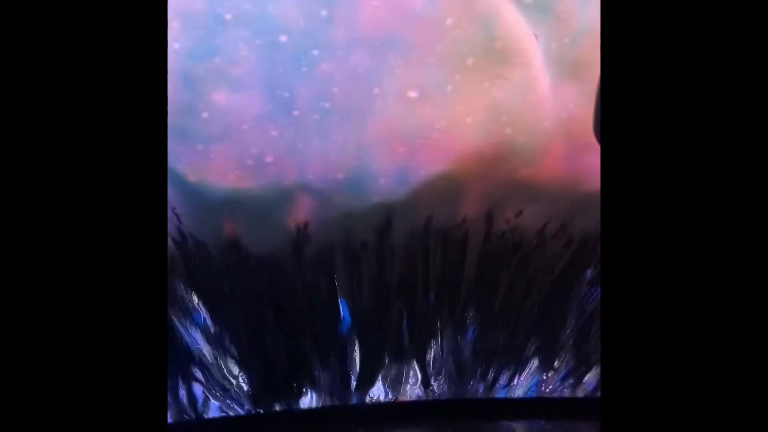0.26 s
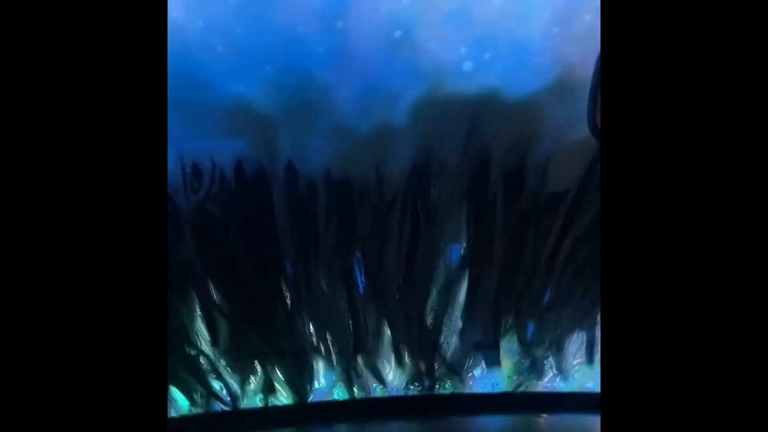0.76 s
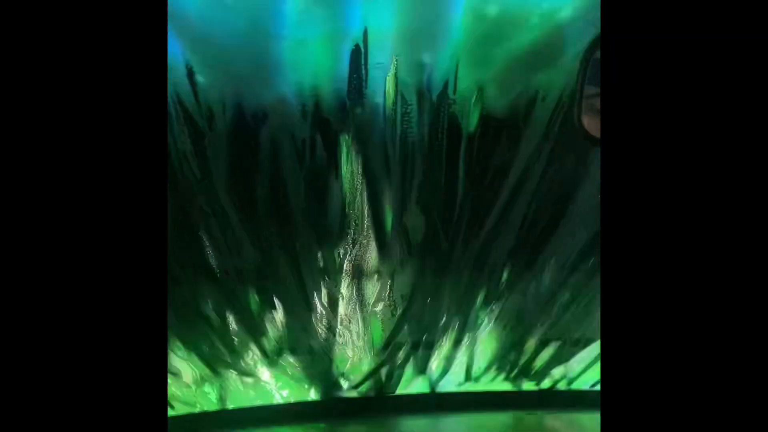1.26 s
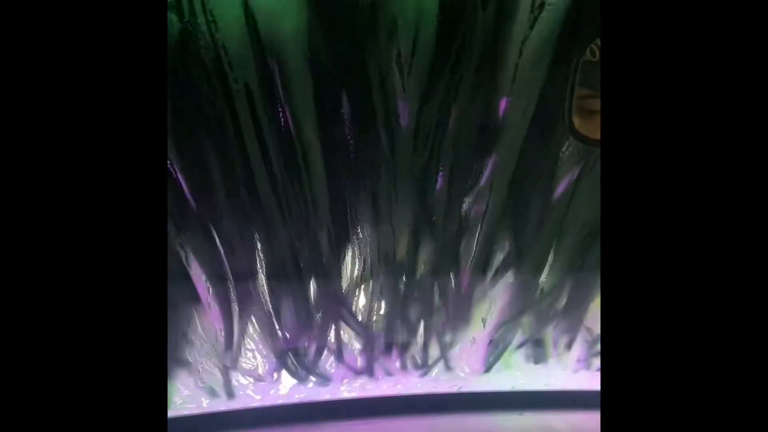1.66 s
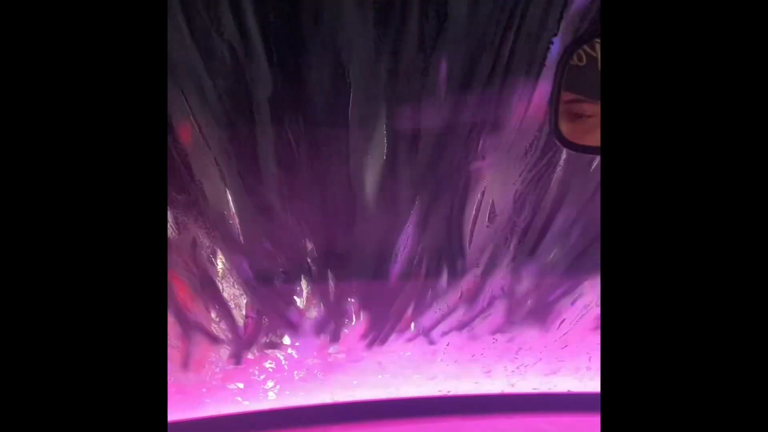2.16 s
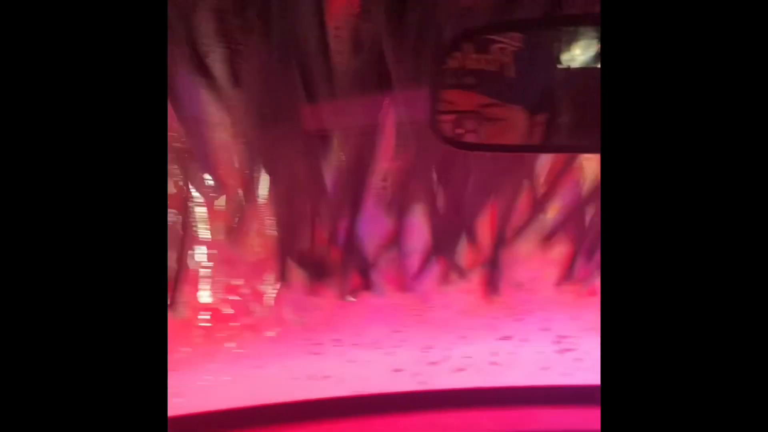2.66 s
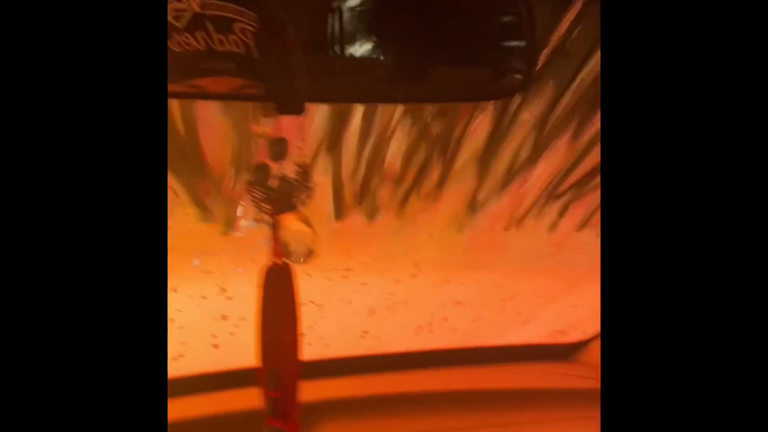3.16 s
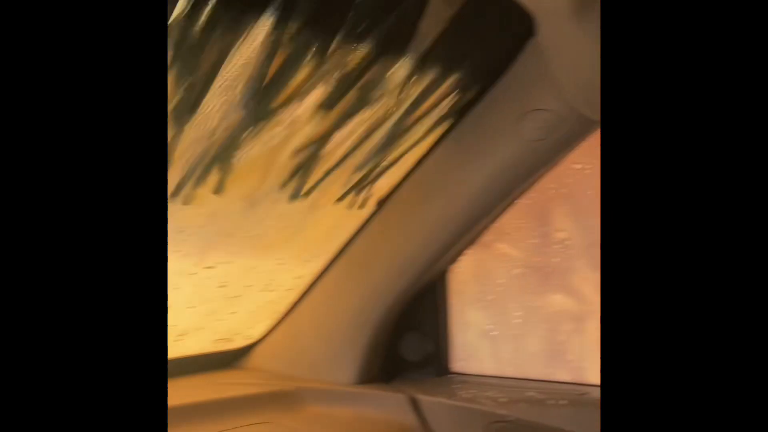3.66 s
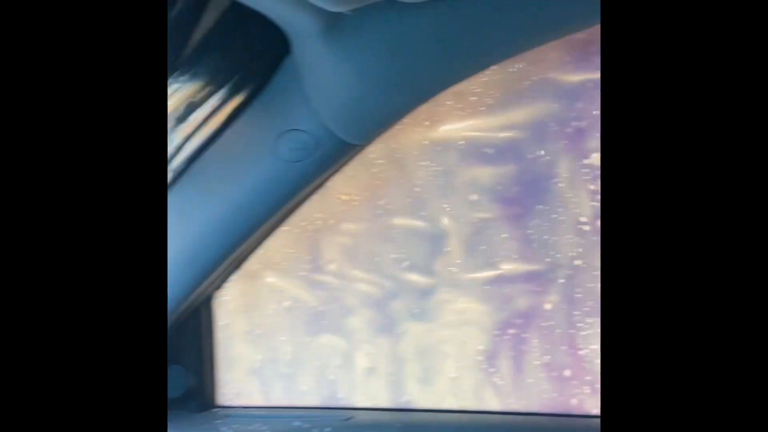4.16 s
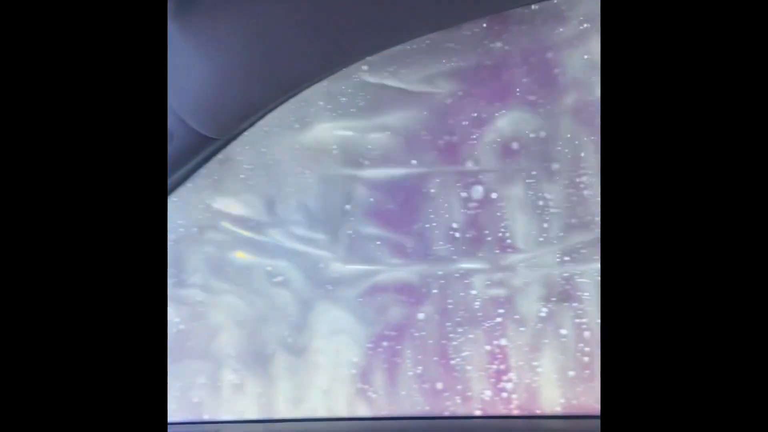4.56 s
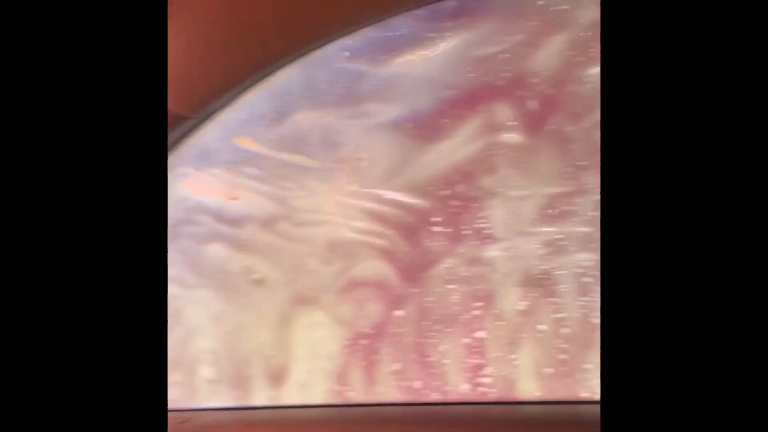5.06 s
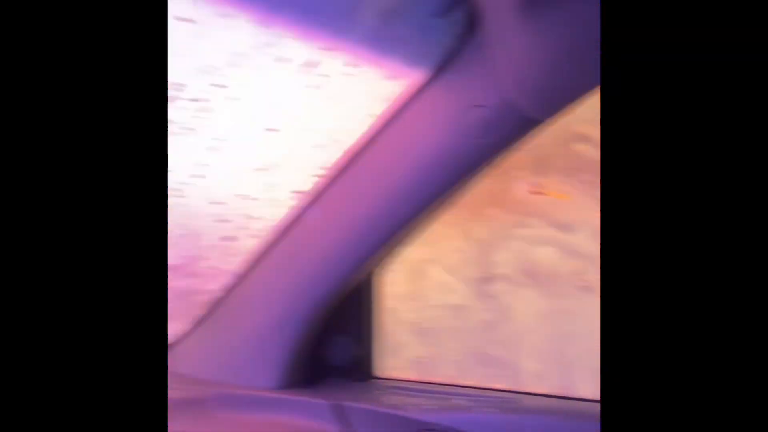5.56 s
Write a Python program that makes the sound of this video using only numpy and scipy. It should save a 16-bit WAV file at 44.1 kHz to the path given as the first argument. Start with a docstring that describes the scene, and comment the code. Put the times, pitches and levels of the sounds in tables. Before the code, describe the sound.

Inside a closed car in an automatic wash, wet strips slap and crackle on the windscreen over deep rumble, then thin to duller thuds and pattering spray.

```python
"""An automatic car wash heard from inside the closed car.
First a roller's wet strips smack and scrub the windscreen, some twenty bundles in the first second: crackling
bursts of tiny blows ring in the glass, heavy bumps in panels and cabin air, under water hiss.
From about 2 s the blows grow sparser and duller as the strips climb to the roof; brief stick-slip squeaks begin.
By 4 s the listener faces the side window, where spray and gobs patter; at the end the pouring on the roof swells."""
import sys
import numpy as np
from scipy import signal
from scipy.fft import rfft, irfft, next_fast_len
from scipy.io import wavfile
from scipy.ndimage import uniform_filter1d

SR = 44100
rng = np.random.default_rng(int(sys.argv[2]) if len(sys.argv) > 2 else 0)


def waveform_to_disk(signal):
    """Save audio, clipped to [-1, 1], as 16-bit WAV at the path in sys.argv[1]."""
    frames = np.transpose(np.atleast_2d(signal))
    scaled = np.clip(frames, -1, 1) * 32767
    samples = np.round(scaled).astype(np.int16)
    wavfile.write(sys.argv[1], SR, samples)


N = 256220
TIME = np.arange(N) / SR
SIZE = next_fast_len(N + SR // 2)
HZ = np.maximum(np.arange(SIZE // 2 + 1) * SR / SIZE, 1)
SIDES = np.array([[1], [-1]])  # left, right


# bundles of wet strips landing, relative levels:
# (time [s], contact [s], thud level [dB], smack level [dB], splash level [dB])
BUNDLE_LANDINGS = [(0.014, 0.043, -33, -30, -38), (.098, 0.017, -40, -30, -41),
                   (0.132, 0.02, -26, -25, -34.5), (.186, 0.0059, -42, -29, -47),
                   (0.22, 0.035, -27, -29, -40), (0.264, 0.024, -34, -25, -36.5),
                   (.303, 0.025, -38, -28, -37.5), (0.338, 0.048, -31, -34, -45),
                   (0.413, .026, -39, -23, -36.5), (0.436, 0.015, -30, -20, -33.5),
                   (0.53, 0.046, -26.5, -24.5, -34), (0.617, 0.028, -39, -29, -36),
                   (0.648, 0.033, -23.5, -25.5, -35.5), (0.742, 0.015, -42, -23.5, -38),
                   (.763, 0.02, -40, -23, -34), (0.832, .016, -41, -28, -35),
                   (.853, .02, -23.5, -25.5, -35), (.885, 0.018, -38, -29.5, -40),
                   (.948, 0.015, -27, -29.5, -37), (0.972, 0.0077, -23.5, -19, -27),
                   (.998, 0.026, -40, -30, -38), (1.055, 0.038, -44, -31, -37.5),
                   (1.103, 0.017, -21.5, -27, -31), (1.155, 0.015, -40, -28, -39),
                   (1.188, 0.0085, -38, -26, -29), (1.233, .016, -21, -40, -51),
                   (1.256, 0.014, -26, -25.5, -39), (1.296, 0.0098, -40, -27, -35),
                   (1.314, 0.023, -38, -26.5, -32), (1.353, 0.019, -25, -31.5, -38.5),
                   (1.385, .016, -27, -46, -55), (1.432, .028, -50, -32, -39.5),
                   (1.512, 0.023, -23.5, -34.5, -48), (1.58, 0.013, -30, -25, -38),
                   (1.613, 0.02, -22.5, -31, -37.5), (1.69, .006, -28, -33.5, -45),
                   (1.72, 0.021, -33, -34.5, -43.5), (1.755, 0.014, -21, -38, -45),
                   (1.82, 0.0061, -44, -37, -36), (1.852, 0.05, -30, -37, -44),
                   (2.07, 0.024, -23, -36, -46), (2.113, 0.014, -24, -33, -40),
                   (2.149, 0.014, -30, -42, -40), (2.24, 0.026, -36, -37, -44.5),
                   (2.302, 0.041, -29.5, -35, -42.5), (2.354, 0.016, -26, -38, -43),
                   (2.448, 0.023, -24, -32.5, -41), (2.556, 0.017, -36, -37, -39),
                   (2.618, .004, -42, -39, -39), (2.648, 0.018, -27, -44, -48),
                   (2.687, 0.021, -28.5, -36, -39), (2.838, 0.013, -40, -39, -38.5),
                   (2.868, 0.027, -32, -45, -42), (3.0, 0.05, -34, -43, -45),
                   (3.125, 0.044, -31.5, -39, -47), (3.192, .016, -40, -38, -42.5),
                   (3.251, 0.031, -46, -35, -40), (3.36, 0.063, -46, -44, -44),
                   (3.451, 0.015, -34, -32.5, -34.5), (3.553, 0.013, -35, -31.5, -39),
                   (3.715, .02, -40, -55, -60), (3.815, 0.047, -30.5, -46, -47.5),
                   (3.95, 0.037, -38, -47, -48), (4.055, .025, -32, -44, -49),
                   (4.14, .025, -42, -36.5, -50), (4.215, .018, -40, -39, -46),
                   (4.27, 0.041, -30.5, -43, -52), (4.352, 0.014, -34, -41, -51),
                   (4.5, 0.016, -29, -44, -58), (4.522, .014, -40, -37.5, -50),
                   (4.57, 0.014, -38, -38, -54), (4.735, 0.027, -30, -46, -54),
                   (4.86, 0.015, -36, -48, -52), (4.92, .004, -47, -45, -43), (5.145, 0.048, -33, -51, -58),
                   (5.32, .02, -32, -45, -56), (5.44, 0.022, -31, -40, -53), (5.66, 0.018, -26.5, -48, -54),
                   (5.71, 0.022, -30, -46, -58)]
# relative spectral density of the smack: (frequency [Hz], level [dB])
SMACK_COLOUR = [(900, -4), (1500, -2), (2000, 0.5), (3200, -2), (3900, -4.5), (5000, -27.5)]
# relative spectral density of the splash: (frequency [Hz], level [dB])
SPLASH_COLOUR = [(2800, -20.5), (4100, 0.5), (5400, 2), (6300, -1), (7500, -5), (9800, -14.5), (11500, -20),
                 (12500, -39)]


def slaps():
    """On the glass each bundle lands as a crackling smack of single strips and a splash of thrown water."""
    smack_rows = [(s, contact_s, db) for s, contact_s, _, db, _ in BUNDLE_LANDINGS]
    splash_rows = [(s, contact_s, db) for s, contact_s, _, _, db in BUNDLE_LANDINGS]
    smack_force = strokes(smack_rows, rise_s=0.004, fall_s=0.012)
    splash_force = strokes(splash_rows, rise_s=0.003, fall_s=0.0084)
    clumps = from_db(0.92 * drift(160))  # clumped strips share the force
    smack_blows = steady(clumps * impacts(3200, 0.55), seconds=0.011)
    splash_blows = steady(clumps * impacts(4200, 0.5), seconds=0.014)
    smack = scatter(smack_force * smack_blows, span_s=0.045, ring_s=0.0053, ring_db=-3.5)
    splash = scatter(splash_force * splash_blows, span_s=0.045, ring_s=0.0078, ring_db=-3.0)
    smack = from_db(0.5) * radiate(smack, glass(SMACK_COLOUR))
    splash = from_db(4.0) * radiate(splash, glass(SPLASH_COLOUR))
    return smack + splash


# relative spectral density of the thud: (frequency [Hz], level [dB])
THUD_COLOUR = [(330, -24.5), (470, 8), (600, -7.5), (720, 0), (850, 0.5), (950, -13), (1300, -11.5),
               (1600, -14.5), (2400, -42.5)]


def thuds():
    """On sheet metal a bundle lands as a dull, hollow thud."""
    blows = scatter(impacts(4000, 0.52), span_s=0.05, ring_s=0.01, ring_db=2.0)
    metal = steady(radiate(blows, glass(THUD_COLOUR)), seconds=0.01)
    landings = [(s, contact_s, db) for s, contact_s, db, _, _ in BUNDLE_LANDINGS]
    return from_db(-0.15) * strokes(landings, rise_s=0.024, fall_s=0.0084) * metal


# hard tips of single strips whipping the glass: (time [s], relative level [dB])
TIP_CRACKS = [(0.136, -24), (0.151, -23), (0.2706, -23), (0.422, -24), (0.4362, -20), (.441, -14),
              (.448, -33), (.5335, -21), (.546, -22), (.563, -23), (.661, -24), (.677, -23), (.748, -19),
              (0.765, -25), (.777, -14), (.835, -25), (.864, -24), (0.975, -19), (.979, -17), (1.111, -25),
              (1.161, -23), (1.195, -21), (1.265, -21), (1.321, -16), (1.335, -23), (1.436, -24),
              (1.457, -23), (1.587, -23), (1.693, -26), (2.118, -26), (2.155, -25), (2.241, -29),
              (2.303, -23), (2.327, -25), (2.366, -29), (2.462, -36), (2.62, -23), (2.697, -23),
              (2.846, -24), (3.205, -29), (3.258, -25), (3.456, -23.5), (3.559, -22), (3.991, -31),
              (4.316, -31), (4.442, -31), (4.921, -30), (5.148, -30), (5.307, -30), (5.368, -30),
              (5.603, -30)]
# relative spectral density of a crack: (frequency [Hz], level [dB])
TIP_COLOUR = [(700, -5), (1500, -2), (2200, -1.5), (3500, 3), (5400, -1), (6400, -9), (7500, -12),
              (9800, -36), (12300, -44)]


def tips():
    """A strip's tip cracks on the windscreen like a tiny whip: a noise burst of about a millisecond."""
    force, fall_s = np.zeros((2, N)), 0.0013
    age = TIME[:SR // 100]
    for s, db in TIP_CRACKS:
        start = int(s * SR)
        crack = rms_one(np.exp(-age / fall_s) * rng.standard_normal((2, len(age))))
        force[:, start:start + len(age)] += from_db(db) * crack
    return from_db(-13.0) * radiate(force, glass(TIP_COLOUR, ringing=0.83))


# roller pressure, as relative rumble level: (time [s], cabin boom level [dB], panel drumming level [dB])
ROLLER_PRESSURE = [(0, -22, -24), (0.3, -27, -19.5), (0.8, -26, -21.5), (1.4, -23.5, -22),
                   (2.0, -26.5, -19.5), (2.55, -21, -21), (3.1, -25.5, -21.5), (3.8, -27, -24),
                   (4.4, -31, -25), (5.2, -28.5, -24), (5.81, -27, -26)]
# heavy bumps of the roller on the body, relative levels:
# (time [s], contact [s], cabin boom level [dB], panel drumming level [dB])
ROLLER_BUMPS = [(0.05, .025, -29, -15.5), (0.14, 0.068, -17, -20), (0.228, 0.042, -14.5, -28),
                (0.372, 0.022, -25, -16.5), (0.437, 0.038, -14.5, -17), (0.555, .018, -36, -16),
                (0.648, .035, -18.5, -20.5), (0.783, 0.025, -15, -26), (.868, .032, -23, -31),
                (1.07, 0.035, -18.5, -22), (1.15, 0.04, -21, -26), (1.41, .03, -21, -34),
                (1.48, 0.039, -25, -32), (1.54, 0.026, -24, -15), (1.59, 0.032, -21, -19),
                (1.675, 0.021, -23, -26), (1.775, 0.039, -19, -32), (1.9, 0.038, -28, -20.5),
                (1.985, 0.024, -19, -17), (2.125, 0.035, -29, -16.5), (2.258, 0.03, -18, -31),
                (2.323, 0.03, -19, -15.5), (2.42, .06, -17, -29), (2.505, .045, -15.5, -16.5),
                (2.57, 0.019, -24, -12.5), (2.68, 0.065, -17, -21), (2.755, 0.021, -15, -19),
                (2.85, 0.03, -30, -18), (2.955, 0.028, -21, -31), (3.005, .02, -19, -17),
                (3.045, 0.093, -16.5, -22), (3.235, 0.029, -20, -18.5), (3.35, .075, -18, -32),
                (3.46, .035, -26, -16), (3.53, 0.024, -23, -16), (3.58, 0.035, -18.5, -37),
                (3.675, 0.041, -36, -23), (3.765, 0.047, -21, -22), (3.845, 0.045, -20, -22),
                (3.995, .03, -19.5, -19.5), (4.05, 0.04, -20, -23), (4.165, .05, -23, -21),
                (4.375, 0.048, -23, -23.5), (4.45, 0.045, -20, -21), (4.545, .028, -23, -21),
                (4.69, .025, -33, -32), (4.755, .045, -25, -23.5), (4.875, .03, -23, -22),
                (5.04, .05, -30, -22), (5.37, 0.02, -30, -22), (5.535, .03, -28, -23),
                (5.715, .03, -24, -40)]
# cabin air resonances: (frequency [Hz], width [Hz], relative level [dB])
CABIN_AIR_MODES = [(52.5, 14.7, 2), (39, 12, -5.5)]
# body panel resonances: (frequency [Hz], width [Hz], relative level [dB])
BODY_PANEL_MODES = [(85.2, 35, -2), (113, 10.7, 0.5), (139, 35, -3), (189, 26, -5.5)]


def roller():
    """Hundreds of soft blows a second drum on the panels and pump the cabin air; heavy bumps stand out."""
    boom_db, drum_db = in_time(ROLLER_PRESSURE)
    boom_rows = [(s, contact_s, db) for s, contact_s, db, _ in ROLLER_BUMPS]
    drum_rows = [(s, contact_s, db) for s, contact_s, _, db in ROLLER_BUMPS]
    boom_bumps = strokes(boom_rows, rise_s=0.023, fall_s=0.025)
    drum_bumps = strokes(drum_rows, rise_s=0.013, fall_s=0.017)
    boom = radiate(impacts(900, 0.42), body(CABIN_AIR_MODES, low_hz=36.3, high_hz=72.0))
    boom = steady(boom, seconds=0.11)
    drum = radiate(impacts(1800, 0.62), body(BODY_PANEL_MODES, low_hz=77.0, high_hz=231))
    drum = steady(flexing(drum, share=0.0504, corner_hz=4.05), seconds=0.06)
    boom_force = np.hypot(from_db(boom_db + 1.3 * drift(12)), from_db(0.5) * boom_bumps)
    drum_force = np.hypot(from_db(drum_db + 0.65 + 0.96 * drift(8.1)), from_db(-1.5) * drum_bumps)
    return boom_force * boom + drum_force * drum


# bundles striking mid bonnet or roof: (time [s], contact [s], relative level [dB])
SHEET_KNOCKS = [(.042, .02, -19), (.132, .018, -19), (1.35, 0.028, -18), (1.818, 0.021, -18),
                (2.778, 0.01, -23), (3.42, 0.06, -23.5), (3.79, 0.019, -25), (3.942, 0.02, -21),
                (4.07, 0.036, -26), (4.315, 0.033, -23.5), (4.46, .025, -26.5), (4.6, 0.017, -25),
                (4.65, .03, -22.5), (5.11, 0.04, -24), (5.51, 0.018, -24), (5.6, 0.019, -21),
                (5.72, 0.052, -26)]
# roof sheet resonances: (frequency [Hz], width [Hz], relative level [dB])
ROOF_SHEET_MODES = [(263.4, 31, 2.5), (306, 57, -3), (384, 81, -3), (467, 67, -5), (566, 110, -17)]


def roof_knocks():
    """A bundle that hits bonnet or roof squarely sets its lowest modes booming."""
    sheet = radiate(impacts(3000, 0.6), body(ROOF_SHEET_MODES, low_hz=225, high_hz=383))
    sheet = steady(flexing(sheet, share=0.0302, corner_hz=5.13), seconds=0.035)
    return from_db(-3.0) * strokes(SHEET_KNOCKS, rise_s=0.011, fall_s=0.016) * sheet


# strips dragging over the glass: (time [s], level [dB])
DRAG_LEVEL = [(0, -35), (1.6, -46), (2.1, -35), (2.7, -40), (3.15, -38), (3.6, -56), (5.1, -47),
              (5.81, -43)]
# relative spectral density of the scrubbing: (frequency [Hz], level [dB])
SCRUB_COLOUR = [(400, -31), (600, 1), (800, -3), (1100, 4), (1400, 0.5), (1900, -5), (2600, -11.5),
                (4000, -30.5)]


def scrubbing():
    """Strips dragged over the glass churn in tiny slips, rougher after each landing."""
    drag_db, = in_time(DRAG_LEVEL)
    landings = [(s, contact_s, db) for s, contact_s, db, _, _ in BUNDLE_LANDINGS]
    drags = strokes(landings, rise_s=0.011, fall_s=0.014)
    force = np.hypot(from_db(drag_db + 1.7 * drift(22)), from_db(-13.5) * drags)
    slips = scatter(impacts(1400, 0.76), span_s=0.04, ring_s=0.012, ring_db=-0.5)
    return force * steady(radiate(slips, glass(SCRUB_COLOUR, ringing=0.26)), seconds=0.025)


# strips catching on the glass: (time [s], relative level [dB], pitch [Hz], glide [Hz/s],
# roughness [Hz], rise [s], fall [s])
STRIP_SQUEAKS = [(2.112, -43, 2970, 0, 500, 0.0038, .007), (2.241, -34, 3040, 0, 120, .004, .007),
                 (2.302, -31, 3100, -1000, 220, .004, 0.016), (2.459, -31, 2710, 0, 500, 0.0066, .008),
                 (3.455, -32, 2500, 0, 350, .004, .007), (3.556, -31.5, 2435, 3000, 300, 0.0055, 0.0076),
                 (4.312, -30.5, 4330, 6000, 350, .006, 0.0056), (4.352, -40, 3800, 0, 500, .005, .007),
                 (4.383, -42, 3800, -8000, 400, .003, .004), (5.18, -36, 3470, 2000, 250, .012, 0.0083),
                 (5.303, -30, 3600, -3000, 600, 0.0058, 0.0086),
                 (5.359, -38.5, 5040, 3000, 400, 0.0069, 0.013), (5.366, -34, 3340, -3000, 120, .005, .007),
                 (5.598, -30, 3050, 0, 250, .009, .006), (5.603, -36, 3530, 10000, 70, 0.0073, 0.014)]
# relative spectral density of the flicked drops: (frequency [Hz], level [dB])
SPATTER_COLOUR = [(1500, -12), (3000, 3), (4500, -2), (6000, -10), (7500, -14), (12000, -28)]


def squeaks():
    """A strip sticks and slips: each slip rings at a slightly different pitch; drops spatter on the glass."""
    level_db, spatter_db, ring_s, slip_count = 1.0, -10.5, 0.0022, 100
    out, age = np.zeros((2, N)), TIME[:SR // 10]
    for s, db, hz, glide, rough_hz, rise_s, fall_s in STRIP_SQUEAKS:
        slip_s = (np.arange(slip_count) + rng.random(slip_count) - 1) * age[-1] / slip_count
        pitch_hz = hz + glide * slip_s + rough_hz * rng.uniform(-0.89, 1, slip_count)
        since_s = np.maximum(age - slip_s[:, None], 0)
        rings = np.sin(2 * np.pi * pitch_hz[:, None] * since_s) * np.exp(-since_s / ring_s)
        chirp = steady(rng.standard_normal((2, slip_count)) @ rings, seconds=0.008)
        shape = np.minimum(age / rise_s, 1) * np.exp(-np.maximum(age - rise_s, 0) / fall_s)
        start = int(s * SR)
        out[:, start:start + len(age)] += from_db(db + level_db) * shape * chirp
    spatter_rows = [(s, rise_s, db) for s, db, _, _, _, rise_s, _ in STRIP_SQUEAKS]
    spatter = strokes(spatter_rows, rise_s=0.004, fall_s=0.049) * impacts(700, 0.6)
    spatter = radiate(spatter, glass(SPATTER_COLOUR, ringing=0.4))
    return radiate(out, np.ones(len(HZ))) + from_db(spatter_db) * spatter


# water on the car, relative levels:
# (time [s], roof pouring level [dB], glass sloshing level [dB], fine spray level [dB])
WATER_FLOW = [(0, -22, -28.5, -32), (0.55, -23, -28.5, -36.5), (1.3, -23, -29, -37),
              (1.8, -24.5, -30, -37.5), (2.1, -24.5, -33.5, -39), (2.7, -24.5, -32, -39),
              (3.5, -25, -35, -38), (4.2, -25.5, -33.5, -38.5), (4.9, -27, -34.5, -40),
              (5.4, -24.5, -33.5, -40.5), (5.81, -21.5, -33, -41)]
# relative spectral density of the sloshing: (frequency [Hz], level [dB])
SLOSH_COLOUR = [(400, -27.5), (600, 0), (740, 4.5), (950, 0.5), (1300, -1.5), (1600, -9.5), (2400, -34.5)]
# relative spectral density of spray on the windscreen: (frequency [Hz], level [dB])
SPRAY_COLOUR = [(900, -12), (1500, 1), (2400, 2), (3500, 0), (4400, -4.5), (5300, -5), (6300, -8.5),
                (7500, -17), (9800, -18), (11500, -29), (12300, -37)]
# relative spectral density of spray on the side window: (frequency [Hz], level [dB])
SIDE_SPRAY_COLOUR = [(900, -4), (1500, 0.5), (2100, 0), (3300, -2.5), (4000, -5), (4700, -6), (6300, -14),
                     (7500, -23), (9800, -22), (11500, -30), (12300, -88)]


def water(turn):
    """Water pours on the roof, sloshes over the glass and patters as spray and gobs, in uneven gushes."""
    roof_db, slosh_db, spray_db = in_time(WATER_FLOW)
    gush = drift(31)  # shared by slosh and spray

    roof = radiate(impacts(3000, 1.64), body(ROOF_SHEET_MODES, low_hz=227.0, high_hz=648))
    roof = steady(flexing(roof, share=0.03, corner_hz=4.0), seconds=0.098)
    roof = from_db(roof_db - 0.9 + 1.1 * drift(5.8)) * roof

    slosh = from_db(slosh_db + gush) * impacts(6000, 0.9)
    slosh = scatter(slosh, span_s=0.09, ring_s=0.02, ring_db=-6.5)
    slosh = radiate(slosh, glass(SLOSH_COLOUR, ringing=0.69))

    spray = from_db(spray_db + 1.5 + 0.57 * gush + 1.33 * drift(90)) * impacts(11000, 0.92)
    spray = scatter(spray, span_s=0.05, ring_s=0.0083, ring_db=-4.5)
    front = radiate(np.sqrt(1 - turn ** 2) * spray, glass(SPRAY_COLOUR, ringing=0.43))
    # streams swapped; this pane hardly rings
    beside = radiate(turn * spray[::-1], glass(SIDE_SPRAY_COLOUR, ringing=0.077))

    pings = from_db(spray_db - 12.5) * droplets(per_s=32, width_hz=320, count=7)
    gobs = turn * from_db(spray_db - 5.5) * splats(per_s=7, fall_s=0.01, count=4)
    return roof + slosh + front + beside + pings + gobs


def droplets(per_s, width_hz, count):
    """Larger droplets ping briefly at `count` pitches, struck `per_s` times a second per stream."""
    out = 0
    for hz in np.geomspace(1500, 5200, count):
        response = resonance(hz, width_hz) * resonance(hz, hz / 2)
        out = out + radiate(impacts(per_s, 0.46), response) / hz
    return rms_one(out)


def splats(per_s, fall_s, count):
    """Gobs of water burst at random in `count` pitch ranges: short patters whose power decays over fall_s."""
    out = 0
    for hz in np.geomspace(950, 3000, count):
        starts = (rng.random(N) < per_s / SR) + 1e-9
        burst_power = signal.lfilter([1], [1, -np.exp(-1 / (fall_s * SR))], starts)
        patter = np.sqrt(burst_power) * impacts(2500, 0.6)
        out = out + radiate(patter, resonance(hz, hz / 4) ** 2) / np.sqrt(hz)
    return rms_one(out)


def impacts(per_s, spread_db):
    """Two unrelated streams of tiny random blows of uneven size, scaled jointly to unit power."""
    unevenness = np.minimum(rng.exponential(1, (2, N)), 4)
    sizes = rng.standard_normal((2, N)) * from_db(spread_db * unevenness)
    return rms_one(sizes * (rng.random((2, N)) < per_s / SR))


def strokes(rows, rise_s, fall_s):
    """Force of blows (time [s], contact [s], level [dB]): each builds up, lasts while in contact, dies away."""
    power = np.zeros(N)
    for s, contact_s, db in rows:
        start = max(int((s - rise_s / 2) * SR), 0)
        age = TIME[start:start + SR // 4] - s
        rise = np.clip(age / rise_s + 0.5, 0, 1)
        fall = np.exp(-np.maximum(age - contact_s, 0) / fall_s)
        power[start:start + len(age)] += (from_db(db) * rise * fall) ** 2
    return np.sqrt(power)


def scatter(force, span_s, ring_s, ring_db):
    """The contact wanders: each span of time adds a brief random ring with a colour of its own."""
    span, age = int(span_s * SR), TIME[:SR // 40]
    rings = rng.standard_normal((N // span + 1, len(age))) * np.exp(-age / ring_s)
    rings *= from_db(ring_db) / np.linalg.norm(rings, axis=1, keepdims=True)
    rings[:, 0] = 1  # the direct blow
    out = np.zeros((2, N + span + len(age)))
    for start, ring in zip(range(0, N, span), rings):
        unit_ring = ring / np.linalg.norm(ring)
        rung = signal.fftconvolve(force[:, start:start + span], [unit_ring], axes=1)
        out[:, start:start + rung.shape[1]] += rung
    return out[:, :N]


def resonance(hz, width_hz):
    """Response of one damped mode, 1 on top."""
    return 1 / (1 + 1j * (HZ ** 2 - hz ** 2) / (HZ * width_hz))


def body(modes, low_hz, high_hz):
    """A part struck all over: its modes add in power and fade steeply outside its range."""
    power = sum(np.abs(from_db(db) * resonance(hz, width_hz)) ** 2 for hz, width_hz, db in modes)
    skirts = (1 + (low_hz / HZ) ** 8) * (1 + (HZ / high_hz) ** 8)
    return causal(10 * np.log10(power / skirts + 1e-12))


# windscreen resonances above its broad response: (frequency [Hz], width [Hz], lift at ringing 1 [dB])
WINDSCREEN_MODES = [(800, 110, 5), (1010, 60, 2.5), (1710, 60, 3.5), (1970, 90, 6), (2130, 80, 5.5),
                    (2360, 110, 6), (2650, 90, 3.5), (2810, 55, 4), (2990, 90, 3.5), (3190, 55, 7),
                    (3365, 70, 4), (4048, 55, 6), (4590, 50, 2.5), (4890, 55, 6.5), (5540, 80, 4),
                    (6400, 80, 3)]


def glass(colour, ringing=1):
    """A contact colour lifted at the windscreen resonances, which ring more or less."""
    lift_db = sum(db / (1 + (2 * (HZ - hz) / width_hz) ** 2) for hz, width_hz, db in WINDSCREEN_MODES)
    return causal(over_hz(colour) + ringing * lift_db)


def causal(db):
    """Minimum-phase response of a dB curve: nothing sounds before its cause."""
    cepstrum = irfft(np.log(from_db(db)), SIZE)
    cepstrum[1:SIZE // 2] *= 2
    cepstrum[SIZE // 2 + 1:] = 0
    return np.exp(rfft(cepstrum))


def flexing(x, share, corner_hz):
    """A panel flexes under load, so its resonances slide up and down by an rms share of their pitch."""
    place = np.cumsum(1 + share * drift(corner_hz))
    place *= (N - 1) / place[-1]
    return np.array([np.interp(place, np.arange(N), side) for side in x])


# likeness of the two microphones: (frequency [Hz], left-right correlation [0-1])
MIC_LIKENESS = [(50, 1), (120, 0.98), (400, 0.95), (620, 0.69), (1200, 0.24), (2000, 0.66), (3000, 0.5),
                (4500, 0.83), (5400, 0.91), (7300, 1), (8800, 0.96), (10500, 0.59)]
# phase by which the left leads: (frequency [Hz], lead [rad])
MIC_LEAD = [(50, 0), (400, -.25), (1700, .1), (2600, 1.4), (3700, .9), (4400, 1.2), (5100, .3), (7100, 3),
            (8000, 3.3), (9800, 6.2)]


def radiate(force, response):
    """Two streams ring through a unit-power response and reach two microphones, partly alike, phase-shifted."""
    mid, side = rfft(force, SIZE) * response / np.sqrt(np.mean(np.abs(response) ** 2))
    alike = np.clip(over_hz(MIC_LIKENESS), 0, 1)
    pair = np.sqrt((1 + alike) / 2) * mid + SIDES * np.sqrt((1 - alike) / 2) * side
    return irfft(pair * np.exp(1j * SIDES * over_hz(MIC_LEAD) / 2), SIZE)[:, :N]


def steady(x, seconds):
    """Hold the power of a stream even over the given span."""
    power = uniform_filter1d(np.mean(x ** 2, axis=0), int(seconds * SR) + 1)
    return x / np.sqrt(power + 1e-9)


def drift(corner_hz):
    """Random wander of unit rms, its spectrum falling off above corner_hz."""
    spectrum = rfft(rng.standard_normal(SIZE)) / (1 + (HZ / corner_hz) ** 2)
    return rms_one(irfft(spectrum, SIZE)[:N])


def from_db(db):
    """Decibels to gain."""
    return 10 ** (np.asarray(db) / 20)


def rms_one(x):
    """Scale to unit power."""
    return x / np.sqrt(np.mean(x ** 2) + 1e-20)


def in_time(rows):
    """Each column of a time table at every sample."""
    s, *columns = np.transpose(rows)
    return [np.interp(TIME, s, column) for column in columns]


def over_hz(points):
    """A table joined by straight lines on a log-frequency axis."""
    hz, value = np.transpose(points)
    return np.interp(np.log(HZ), np.log(hz), value)


# listener turning from windscreen to side window: (time [s], share of the turn [0-1])
LISTENER_TURN = [(0, 0.05), (2.5, 0.25), (3.3, 0.46), (4.0, 0.97), (4.7, 1), (5.3, 0.99), (5.81, 0.99)]
# colour facing the side window relative to facing forward: (frequency [Hz], level [dB])
ASIDE_COLOUR = [(60, -1), (112, 3.5), (150, -2), (185, -4), (225, 0.5), (265, 3), (340, -1), (520, 1),
                (620, 2.5), (820, -0.5), (1100, 0.5), (10000, -2.5)]
# cabin balance between microphones: (frequency [Hz], left minus right [dB])
CABIN_TILT = [(60, 0), (97, 1.0), (160, -0.5), (250, -1.5), (410, -0.5), (660, -1.0), (1070, 0),
              (1720, -0.5), (2780, -2.5), (4490, 0), (7250, -2), (11700, 1)]


def scene():
    """All sources share the cabin's balance; as the listener turns, a second colour fades in."""
    turn = np.clip(in_time(LISTENER_TURN)[0], 0, 1)
    blows = slaps() + thuds() + tips() + roller() + roof_knocks()
    friction = scrubbing() + squeaks()
    cabin = rfft(blows + friction + water(turn), SIZE) * from_db(SIDES * over_hz(CABIN_TILT) / 2)
    ahead = irfft(cabin, SIZE)[:, :N]
    aside = irfft(cabin * causal(over_hz(ASIDE_COLOUR)), SIZE)[:, :N]
    return (1 - turn) * ahead + turn * aside


def record(dry):
    """An elliptic low-pass cuts the top of the treble steeply."""
    cutoff_hz, ripple_db, stop_db = 12300, 0.2, 80
    lowpass = signal.ellip(10, ripple_db, stop_db, cutoff_hz, fs=SR, output="sos")
    return signal.sosfilt(lowpass, dry)


dry = scene()
out = record(dry)
waveform_to_disk(out)
```